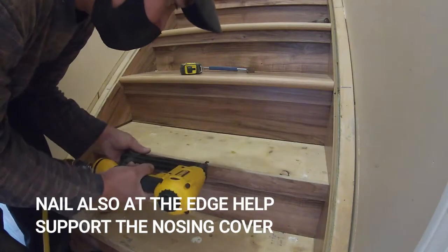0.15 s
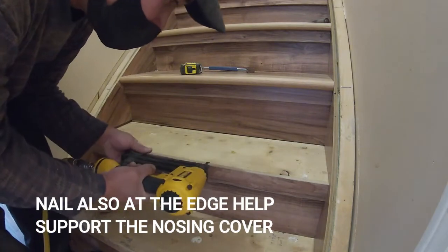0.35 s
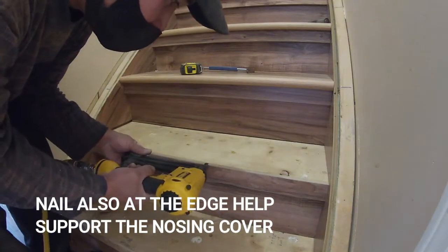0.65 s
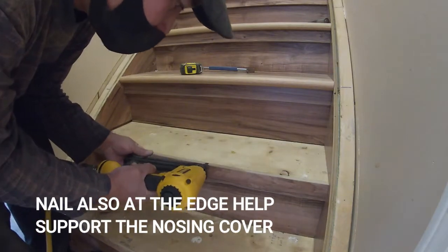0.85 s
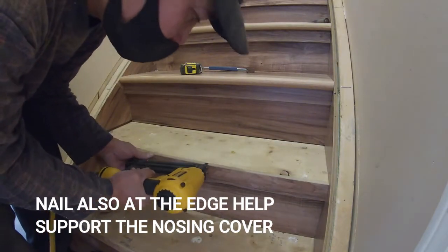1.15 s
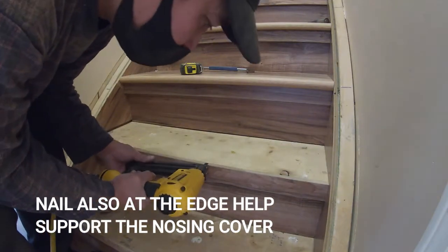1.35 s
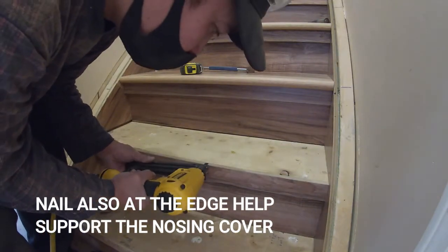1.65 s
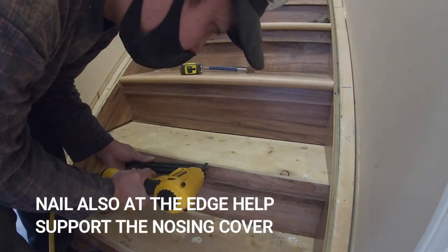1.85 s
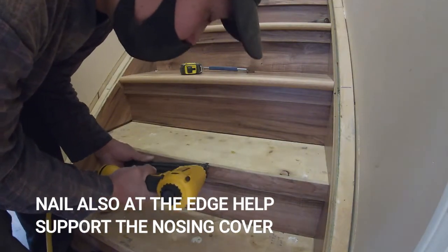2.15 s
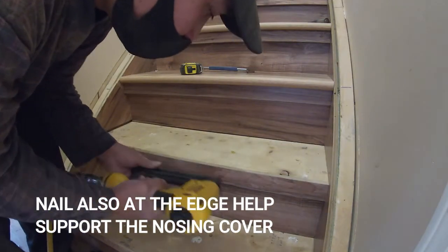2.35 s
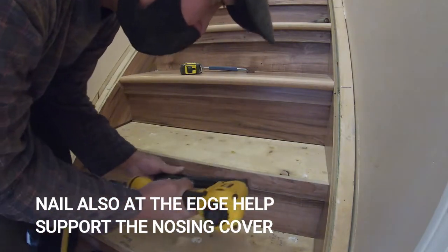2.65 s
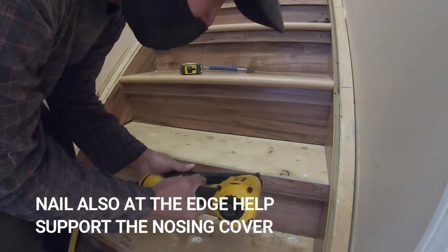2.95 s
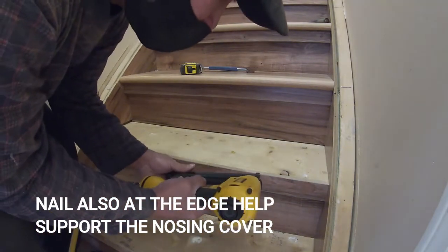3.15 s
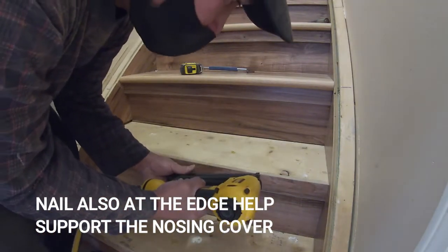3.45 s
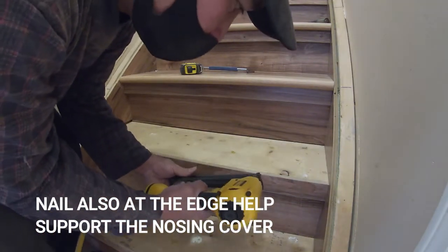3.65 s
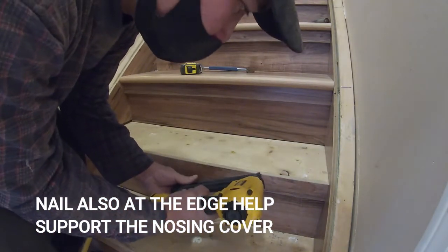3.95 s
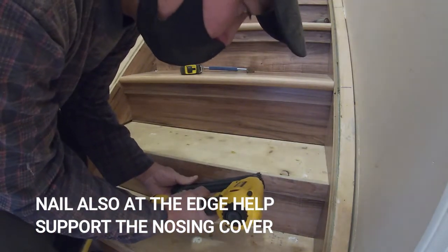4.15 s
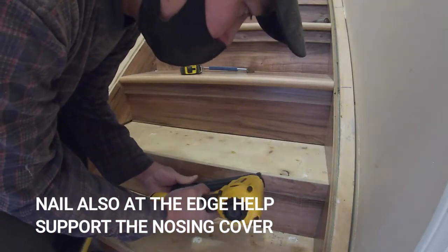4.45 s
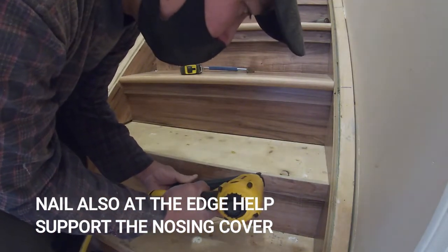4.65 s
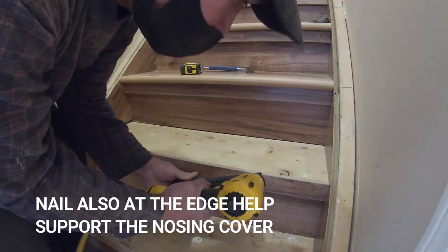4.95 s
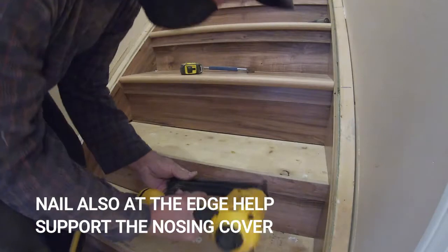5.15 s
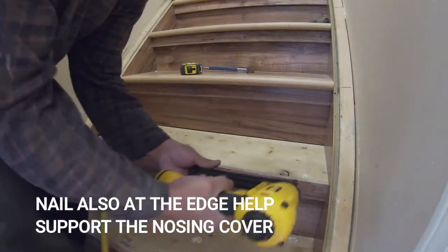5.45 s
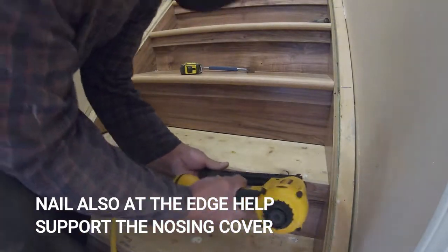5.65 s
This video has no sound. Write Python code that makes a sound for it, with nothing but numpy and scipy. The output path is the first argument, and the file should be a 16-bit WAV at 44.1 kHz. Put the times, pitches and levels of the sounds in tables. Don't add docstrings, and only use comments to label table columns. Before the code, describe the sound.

In a small, hard-walled stairwell, a leaking air line hisses constantly, with faint pipe-like tones and a thin, fluttering whistle around four kilohertz, sometimes shadowed by a lower one. Light clicks and taps of tool handling come at 0.65 to 1.0 s. At 2.0 s an air nailer fires: a violent, sharp crack into wood, a brief rush of air, then at 2.09 s a valve clack, piston slap and bright exhaust burst fading over a few tenths, with a low stair shudder. The hiss sinks and becomes duller, then partly recovers. Soft bumps at about 3.0 s, small ticks and a faint sleeve brush near 3.65 s, and a firmer wooden knock at 4.08 s as the tool is set down. A second shot hits at 4.92 s, its return and exhaust at 5.03 s. Faint touches follow at 5.3 and 5.6 s over the subdued leak. Close mono microphone, dry with short reflections, peaks slightly rounded.

```python
import sys
import numpy as np
from scipy import signal
from scipy.fft import rfft, irfft, next_fast_len
from scipy.io import wavfile

SR = 44100
rng = np.random.default_rng(int(sys.argv[2]) if len(sys.argv) > 2 else 0)


def dump(signal):
    limited = np.clip(np.atleast_2d(signal).T, -1, 1)
    pcm = np.round(limited * 32767).astype(np.int16)
    wavfile.write(sys.argv[1], SR, pcm)


def elevation(decibels):
    levels = np.asarray(decibels, float)
    return 10 ** (levels / 20)


N = 255824

# (frequency [Hz], t60 [s], level on first drive [dB], on second drive [dB],
# on first return [dB], on second return [dB], on a light touch [dB])
STAIR_MODES = [(42.57, 0.57, -33.5, -19, -25, -24, -36), (97.8, 0.39, -16.5, -10.5, -5, -9, -10.5),
               (146.4, .25, -23, -15, -4.5, -2, -5.5), (171.4, 0.53, -10, -6, -16, -8.5, -6),
               (200, .25, -20, -38, -10.5, -14, -4.5), (227.4, 0.31, -23, -15.5, -14.5, -14.5, -8),
               (250, .15, -17.5, -17.5, -16, -8, -4), (298, .1, -19, -17.5, -22.5, -16, 1),
               (333.7, 0.22, -23, -8.5, -23, -10.5, -12), (382.4, 0.076, -17.5, -12, -14.5, -6.5, -12),
               (431, 0.03, -13.5, 2.5, -17, 2, 10.5), (562, 0.041, -10, -3, -22, -21, -5),
               (603.7, 0.13, -14.5, -16.5, -12.5, -23, -4.5), (739.4, 0.04, -6, -9.5, -15, -16, -4.5),
               (1056, .03, -10.5, -8.5, -28, -13, -0.5), (1444, 0.043, -9, -3, -25.5, -24, -19),
               (3214, .02, -13, -1.5, -16, -30.5, -7)]
# (time [s], strength [dB], contact [ms], lowest board moved [Hz])
FIRST_DRIVE = [
    (1.9975, -7.5, .3, 30),
    (2.0085, -19, .3, 30),
]
SECOND_DRIVE = [
    (4.9161, -7.5, 0.63, 30),
    (4.9245, -18, .3, 29.9),
]
FIRST_RETURN = [
    (2.0882, -13, 0.86, 29.6),
    (2.123, -9.5, 3.8, 200),
]
SECOND_RETURN = [
    (5.0308, -11, 0.55, 30),
    (5.062, -10, 2.3, 200),
]
TOUCHES = [(0.653, -35.5, 1.7, 300), (0.78, -45, 3.3, 30.9), (0.86, -38.5, 4.6, 120),
           (0.918, -38.5, 1.8, 151), (1.001, -51, 1.7, 170), (2.961, -40.5, 9.7, 29.8),
           (3.021, -36, 8.8, 30), (3.054, -34, 9.9, 29.7), (3.083, -46.5, 0.91, 297),
           (3.622, -36, 1.9, 296), (3.805, -40.5, 2.1, 250), (4.0754, -27, 0.78, 99.4),
           (4.089, -37, 1.1, 250), (4.11, -26.5, 7, 70), (5.319, -38.5, 5.7, 30), (5.569, -41, 2, 150)]
RATTLE_DB, RATTLE_T60_S = -34, .4


def stair():
    out = np.zeros(N)
    t = np.arange(SR // 4) / SR
    for kind, blows in enumerate([FIRST_DRIVE, SECOND_DRIVE, FIRST_RETURN, SECOND_RETURN, TOUCHES]):
        force = np.full(N, 1e-18)
        noises = rng.standard_normal((len(blows), len(t)))
        for (s, db, contact_ms, cut_hz), noise in zip(blows, noises):
            start = round(s * SR)
            push = np.hanning(max(round(contact_ms * SR / 1000), 1) + 2)
            nudges = elevation(RATTLE_DB - 60 * t / RATTLE_T60_S) * noise
            nudges[0] = 1
            blow = np.convolve(nudges, push / push.sum())[:len(t)]
            blow = signal.sosfilt(signal.butter(2, cut_hz, "high", fs=SR, output="sos"), blow)
            force[start:][:len(t)] += elevation(db) * blow[:N - start]
        for hz, t60_s, *kind_db in STAIR_MODES:
            r = elevation(-60 / (t60_s * SR))
            w = 2 * np.pi * hz / SR
            ring = signal.lfilter([0, np.sin(w)], [1, -2 * r * np.cos(w), r * r], force)
            out += elevation(kind_db[kind]) * ring
    return out


# ((low edge [Hz], high edge [Hz], rise [ms], t60 [ms]), # list of
# (time [s], peak level [dB]))
STRIKES = ((1600, 10000, .33, 30), [(1.9962, -5), (4.9162, -12)])
NAIL_SEATS = ((1500, 5000, 4.3, 26), [(2.003, -0.49), (4.9227, -1.7)])
KNOCKS = ((500, 2600, 1.8, 43), [(.918, -29), (4.0746, -28), (4.922, -7.5), (2.0005, -9)])
VALVE_CLICKS = ((2800, 5300, 2.2, 6.1), [(2.0835, -3), (5.025, -5)])
RETURN_SLAPS = ((300, 15500, .5, 15), [(2.0895, -7), (5.031, -9)])
LOW_SWELL = ((60, 980, 32, 14), [(1.978, -9)])
BROAD_SWELL = ((610, 5000, 25, 11), [(4.893, -17)])
TICKS = ((5700, 7800, 1.2, 27), [(1.858, -37), (1.965, -47.5), (2.006, -9.5), (3.08, -57)])
HOSE_CLICKS = ((3700, 8000, 1.7, 60), [(.649, -33.5), (.912, -44)])
CLOTH_LOW = ((2200, 2930, 30, 456), [(3.65, -41)])
CLOTH_HIGH = ((2760, 3840, 60, 400), [(3.7, -45.5)])


def cracks():
    out = np.zeros(N)
    t_ms = np.arange(SR // 3) / SR * 1000
    kinds = [STRIKES, NAIL_SEATS, KNOCKS, VALVE_CLICKS, RETURN_SLAPS, LOW_SWELL, BROAD_SWELL,
             TICKS, HOSE_CLICKS, CLOTH_LOW, CLOTH_HIGH]
    for (low_hz, high_hz, rise_ms, t60_ms), events in kinds:
        rise = (t_ms / rise_ms) ** 2
        decay = elevation(-60 * (t_ms - rise_ms) / t60_ms)
        shape = np.where(t_ms < rise_ms, rise, decay)
        band = signal.butter(2, [low_hz, high_hz], "band", fs=SR, output="sos")
        for s, db in events:
            burst = signal.sosfilt(band, rng.standard_normal(len(t_ms)))
            out[round(s * SR):][:len(t_ms)] += elevation(db - 4) * shape * burst / burst.std()
    return out


# (piston fires [s], piston returns [s], blow-by level [dB], exhaust level [dB], exhaust hold [s])
SHOTS = [
    (1.9982, 2.0908, -0.5, -0.5, 0.15),
    (4.915, 5.0293, -1, -3.5, 0.11),
]
# (stroke [0 firing, 1 return], delay [s/1000], level [dB], length [ms])
PISTON_SNAP = [
    (0, 1, 0, .85),
    (0, 3.5, -3.5, 4.0),
    (0, 6.5, -11.5, 4.5),
    (1, -1, -6.5, 6.5),
]


def piston_snaps():
    out = np.zeros(N)
    for shot in SHOTS:
        for stroke, delay_ms, db, length_ms in PISTON_SNAP:
            start = round((shot[int(stroke)] + delay_ms / 1000) * SR)
            samples = length_ms * SR / 1000
            cycle = np.arange(round(samples)) / samples
            out[start:][:len(cycle)] += elevation(db) * np.sin(2 * np.pi * cycle)
    return out


# (frequency [Hz], level [dB per Hz])
JET = [(180, -38), (300, -3.5), (378, -5), (493, -12), (592, -13), (1020, -14.5), (1290, -10.5),
       (2770, -11), (4260, -10.5), (9450, -25.5), (14300, -50.5), (15200, -53), (15900, -66)]
AIR_BANDS_HZ = [300, 900, 3000, 8500, 14000]
# (steady flow [dB],
# first burst above it [dB], burst fade [dB per s], release [dB per s])
BLOW_BY = [(-18, 13.5, 603.5, 302), (-18.5, 11, 696.5, 301), (-11.5, 9, 698.5, 298.5),
           (-11.5, 17, 599.5, 301), (-6.5, 21.5, 712.5, 299)]
EXHAUST = [(-10, 3, 140, 76), (-13, 5, 470, 88), (-16.5, 9.3, 220, 88.6), (-8.5, 23.8, 230, 143),
           (2.5, 21.9, 280, 210)]
BLOW_BY_LAG_S, VENT_LAG_S = 0.012, .0005


def exhaust():
    gain = 1e-9
    for fires, returns, blow_db, exhaust_db, hold_s in SHOTS:
        blow_start = fires + BLOW_BY_LAG_S
        gain = gain + vent(BLOW_BY, blow_start, blow_db, returns - blow_start)
        gain = gain + vent(EXHAUST, returns + VENT_LAG_S, exhaust_db, hold_s)
    return air_noise(JET, AIR_BANDS_HZ, 20 * np.log10(gain), patchy_db=1.5)


def vent(bands, start_s, db, hold_s):
    flow, burst, fade, release = np.transpose(bands)[:, :, None]
    t = np.maximum(since(start_s), 0)
    rise = np.minimum(t / 0.0056, 1)
    steady = elevation(db + flow - release * np.maximum(t - hold_s, 0))
    return rise * steady * (1 + elevation(burst - fade * t))


# (time [s], pitch [Hz], level [dB])
WHISTLE = [(0, 4400, -72), (0.45, 4400, -62), (0.58, 4310, -50), (0.85, 4245, -45), (1.1, 4200, -47),
           (1.3, 4160, -46), (1.55, 4140, -51), (1.95, 4110, -56), (2.45, 4240, -40), (2.85, 4270, -50),
           (3.05, 4340, -45), (3.27, 4330, -41), (3.5, 4310, -45), (3.75, 4270, -42), (4.0, 4235, -50),
           (4.5, 4140, -47), (4.9, 4120, -48), (5.8, 4070, -55)]
# (multiple of the pitch [ratio], level [dB])
WHISTLE_PARTIALS = [(.5, -15), (1, 0), (1.5, -24), (2, -20), (2.5, -26)]
# (centre [s], half length [s], level [dB])
LOW_WHISTLE = [
    (.9, 0.17, -59),
    (1.448, .35, -50.5),
    (3.45, 0.47, -50.5),
    (4.6, 0.28, -52),
]
LOW_RATIO = .835
SPELL_EDGE_DB = 7


def leak():
    change = leak_change()
    hz, db = in_time(WHISTLE)
    spells = [top - SPELL_EDGE_DB * (since(s) / half) ** 2 for s, half, top in LOW_WHISTLE]
    high = whistle(hz, db, WHISTLE_PARTIALS, change)
    low = whistle(LOW_RATIO * hz, np.max(spells, axis=0), [(1, 0), (2.2, -14)], change)
    return hiss(change) + high + low


def whistle(hz, db, partials, change):
    db = db + change[3]
    overtone_db = np.minimum(-53 + change[4] - db, 0)
    phase = 2 * np.pi * np.cumsum(hz + 12.0 * drift(60.0)) / SR
    tone = 0
    for multiple, rel_db in partials:
        tone = tone + elevation(rel_db + overtone_db * (multiple > 1)) * np.sin(multiple * phase)
    return np.sqrt(2) * elevation(db + 3.2 * drift(45.0)) * tone


# (frequency [Hz], level [dB per Hz])
HISS = [(59, -54), (100, -26), (149, -12.5), (218, -4), (326, -12.5), (355, -15), (497, -11), (825, -3),
        (2810, -7.5), (3390, 3.5), (3690, -10), (4190, -3.5), (5170, -10.5), (9740, -31.5), (15500, -74.5)]
HISS_BANDS_HZ = [300, 1400, 1900, 5300, 6500]
LEAK_DB = [-27.5, -25, -30.5, -33, -27]
# (frequency [Hz], width [Hz], level [dB])
PIPE_TONES = [(167, 11, -65), (359, 31, -57.5), (844.4, 4.4, -61.5), (1243, 68, -63.5), (1410, 96, -64.5)]
TONES_DB, TONE_CUT_HZ = 3.5, 1700


def hiss(change):
    white = rng.standard_normal(N)
    tones = np.zeros(N)
    for hz, width_hz, db in PIPE_TONES:
        tones += elevation(db) * resonate(white, hz, width_hz) * np.sqrt(SR / width_hz / np.pi)
    tones = signal.sosfilt(signal.butter(4, TONE_CUT_HZ, fs=SR, output="sos"), tones)
    levels_db = change + np.array(LEAK_DB)[:, None]
    return air_noise(HISS, HISS_BANDS_HZ, levels_db, patchy_db=0.6) + tones * elevation(TONES_DB + change[0])


# (time [s], share of the full duck [0-1])
BANGS = [
    (2.0, .99),
    (4.08, .6),
    (4.92, .95),
]
# (full duck [dB], hold [s], duck that stays [dB], recovery [dB per s])
DUCK = [(7.97, 0.61, 0, 11), (17.16, 0.81, 12, 6.5), (19.08, 0.65, 10, 34), (20.8, 0.71, 11.5, 27),
        (27.96, 1, 11.5, 9)]
# (time [s], level [dB])
LEAK_FLOW = [(0, 3), (.4, 0.5), (1.2, 1), (1.9, 1.05), (3.0, -2), (3.75, 0.5), (4.4, -1), (5.8, 1)]
FLOW_SHARE = [.3, .6, .8, .9, 1.8]
DUCK_ATTACK_S = .5


def leak_change():
    depth, hold, stays, rate = np.transpose(DUCK)[:, :, None]
    duck = np.zeros((len(DUCK), N))
    for s, share in BANGS:
        recovered = rate * np.maximum(since(s) - hold * share, 0)
        back = np.maximum(share * depth - recovered, stays)
        duck = np.maximum(duck, back * np.clip(since(s) / DUCK_ATTACK_S, 0, 1))
    return np.array(FLOW_SHARE)[:, None] * in_time(LEAK_FLOW) - duck


# (time [s], peak level [dB])
RUMBLE = [
    (.8, -69),
    (1.75, -68.5),
    (2.0, -44),
    (2.17, -32.5),
    (2.45, -57),
    (3.0, -55),
    (4.93, -43),
    (5.05, -28.5),
    (5.45, -44),
]
RUMBLE_FLOOR_DB, RUMBLE_RISE_S, RUMBLE_DB_PER_S = -74, 0.086, 62.5


def rumble():
    low = signal.sosfilt(signal.butter(2, [30, 55], "band", fs=SR, output="sos"), rng.standard_normal(N))
    level = elevation(RUMBLE_FLOOR_DB)
    for s, db in RUMBLE:
        swell = np.clip(since(s) / RUMBLE_RISE_S, 0, 1)
        level = level + swell * elevation(db - RUMBLE_DB_PER_S * np.maximum(since(s), 0))
    return level * low / low.std()


ROOM_T60_S, ROOM_DB, WALL_CUT_HZ = 0.46, -28.5, 2020


def stairwell(x):
    size = next_fast_len(N + SR)
    w = 2 * np.pi * np.arange(size // 2 + 1) / size
    dull = 1 / (1 + 1j * w * SR / (2 * np.pi * WALL_CUT_HZ))
    echo = 0
    for k, lag in enumerate(np.round(rng.uniform(.009, .04, size=10) * SR)):
        loop = elevation(-60 * lag / SR / ROOM_T60_S) * dull * np.exp(-1j * w * lag)
        echo = echo + (-1) ** k * loop / (1 - loop)
    return irfft(rfft(x, size) * echo, size)[:N]


def air_noise(spectrum, centres_hz, levels_db, patchy_db):
    out = np.zeros(N)
    edges = 25 * 2 ** (np.arange(29) / 3)
    edges = edges[edges > spectrum[0][0]]
    white = rng.standard_normal((2, N))
    together = drift(15.0)
    index = np.arange(len(centres_hz))
    for k, (low, high) in enumerate(zip(edges, edges[1:])):
        hz = np.sqrt(low * high)
        place = np.interp(np.log(hz), np.log(centres_hz), index)
        weights = np.clip(1 - abs(index - place), 0, 1)
        band = signal.sosfilt(signal.butter(4, [low, high], "band", fs=SR, output="sos"), white[k % 2])
        flicker_db = patchy_db * (0.33 * together + drift(5.9))[::8]
        gain = elevation(at_hz(spectrum, hz) + weights @ levels_db[:, ::8] + flicker_db)
        out += band * np.repeat(gain, 8)[:N]
    return out


def resonate(x, hz, width_hz):
    r = np.exp(-np.pi * width_hz / SR)
    feedback = [1, -2 * r * np.cos(2 * np.pi * hz / SR), r * r]
    return signal.lfilter(np.array([1, 0, -1]) * (1 - r * r) / 2, feedback, x)


def drift(rate):
    r = np.exp(-80 * np.pi * rate / SR)
    slow = signal.lfilter([1], [1, -2 * r, r * r], rng.standard_normal(N // 40 + 2002))[2000:]
    return np.interp(np.arange(N) / 40, np.arange(len(slow)), slow / slow.std())


def since(s):
    return np.arange(N) / SR - s


def in_time(rows):
    s, *columns = np.transpose(rows)
    return np.array([np.interp(np.arange(N) / SR, s, c) for c in columns])


def at_hz(points, hz):
    point_hz, db = np.transpose(points)
    return np.interp(np.log(hz), np.log(point_hz), db)


def scene():
    hits = stair() + cracks() + piston_snaps()
    mono = hits + elevation(ROOM_DB) * stairwell(hits) + exhaust() + leak() + rumble()
    return np.array([mono, mono])


def low_pass(x):
    return signal.sosfilt(signal.butter(12, 16370, fs=SR, output="sos"), x)


MIC_EDGE_HZ, MIC_TOP_DB = 9860, -14.5
CUTOFF_HZ = 16300


def record(dry):
    dull = signal.sosfilt(signal.butter(6, MIC_EDGE_HZ, fs=SR, output="sos"), dry)
    heard = dull + elevation(MIC_TOP_DB) * (dry - dull)
    rounded = 1.196 * np.tanh(heard / 1.225)
    mix = signal.sosfilt(signal.cheby2(10, 60, CUTOFF_HZ, fs=SR, output="sos"), rounded)
    mix = np.clip(mix, -1, 1)
    return low_pass(mix)


dry = scene()
out = record(dry)
dump(out)
```